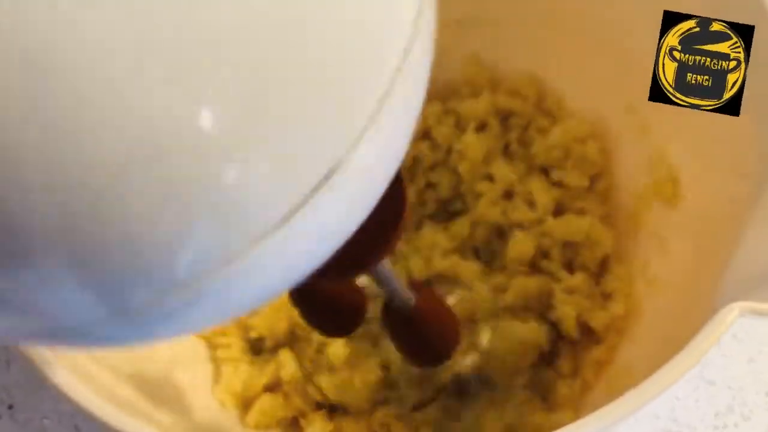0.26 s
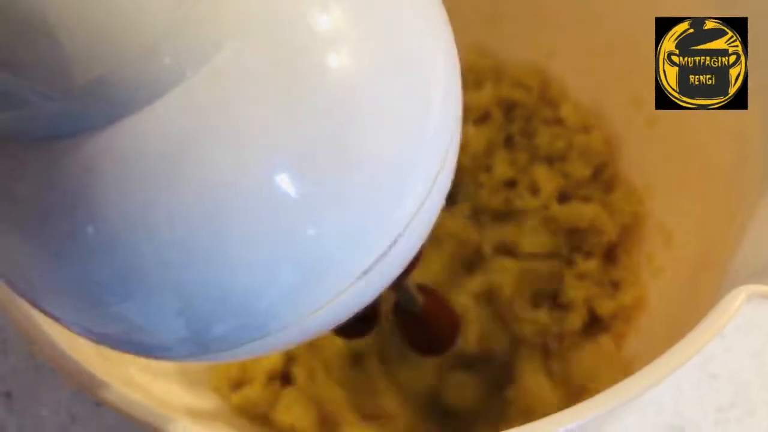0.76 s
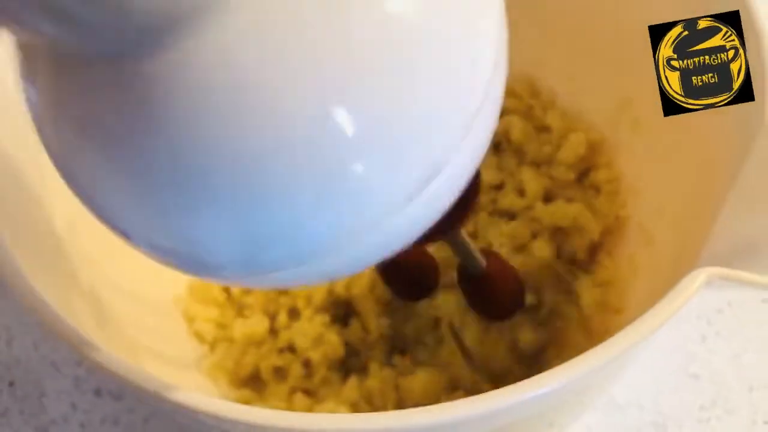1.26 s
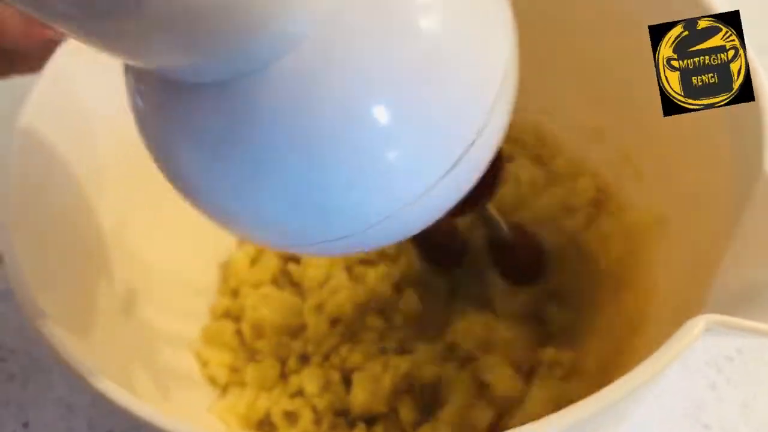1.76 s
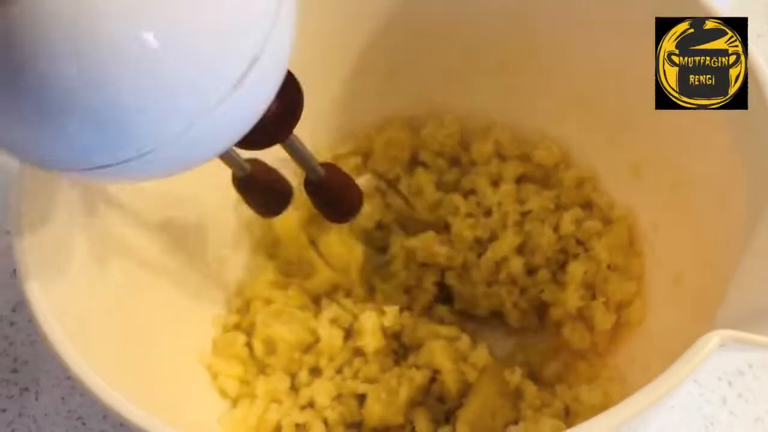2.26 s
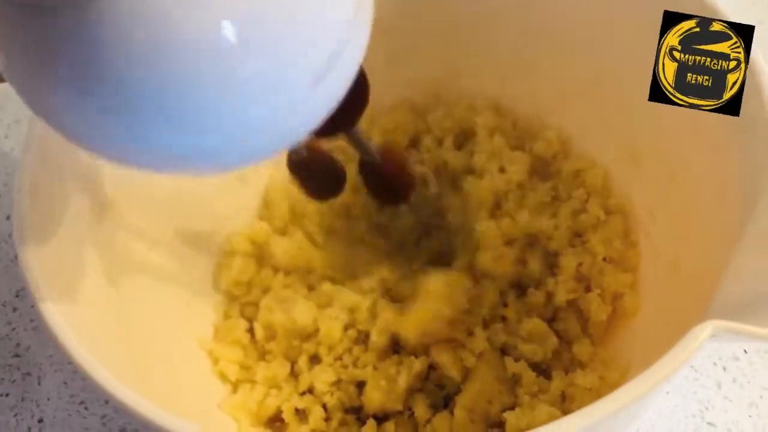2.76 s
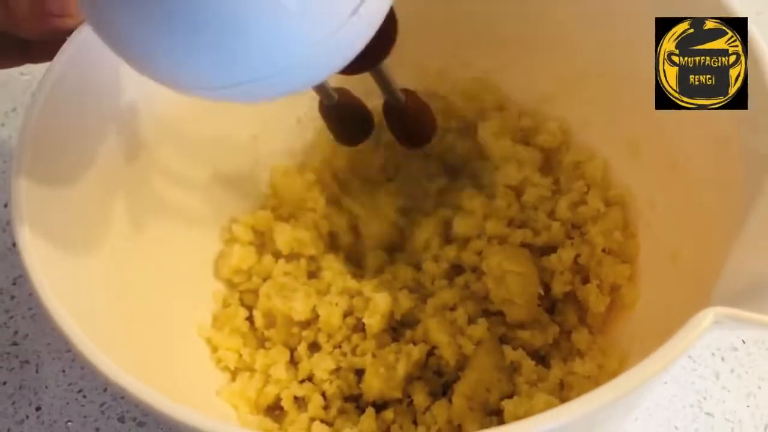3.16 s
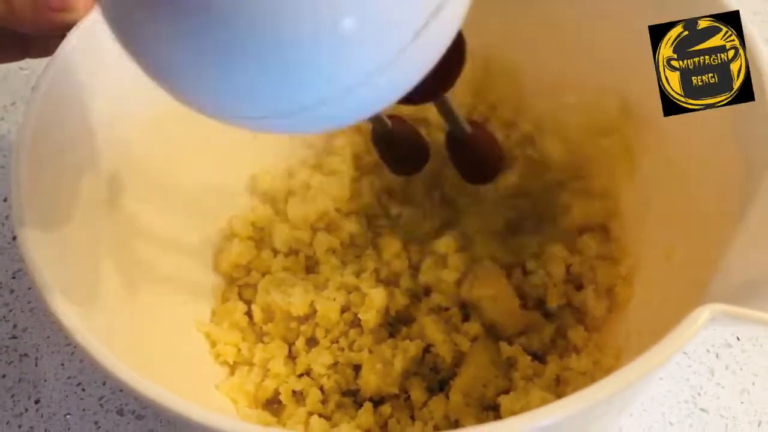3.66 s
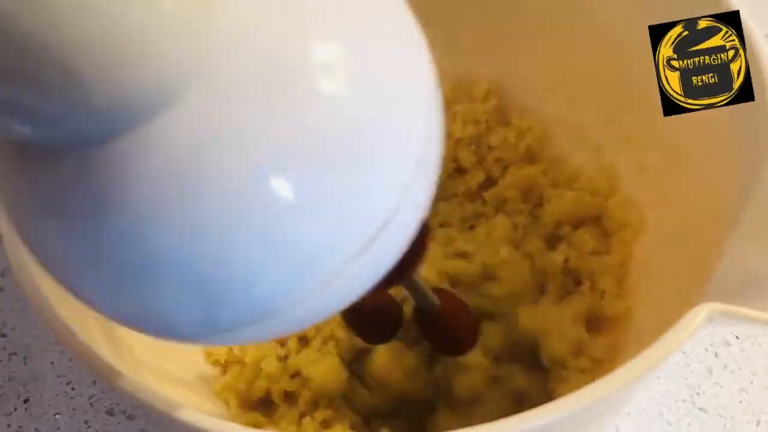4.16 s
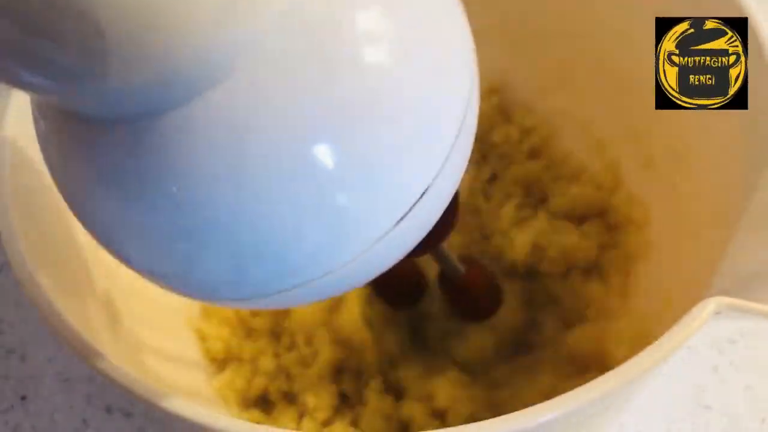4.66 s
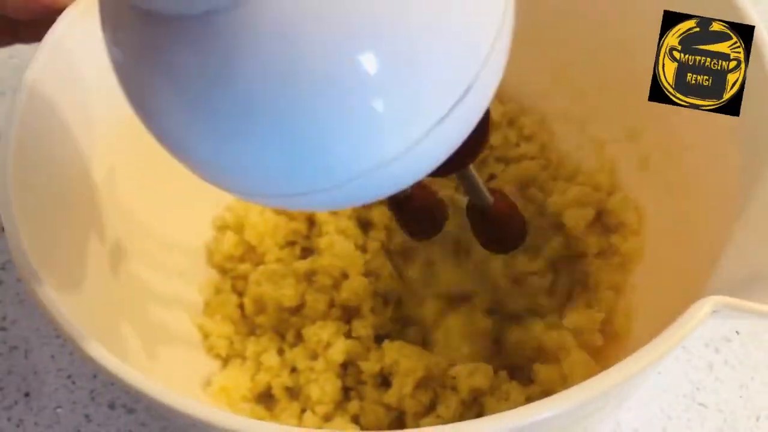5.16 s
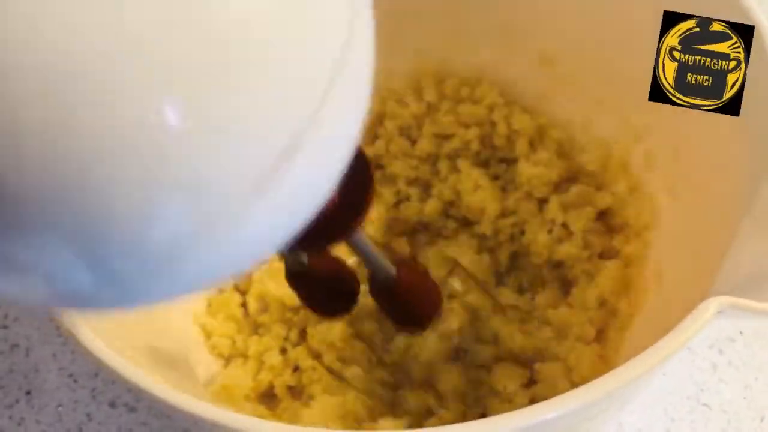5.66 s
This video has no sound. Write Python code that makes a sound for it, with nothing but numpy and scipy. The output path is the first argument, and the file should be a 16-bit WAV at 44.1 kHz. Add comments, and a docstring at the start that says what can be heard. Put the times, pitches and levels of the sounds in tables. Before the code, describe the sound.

An electric mixer is pulsed in crumbly dough, its whine repeatedly leaping up and sinking away, with dull bowl knocks and faint rumble.

```python
"""Short bursts of a hand mixer, whirring up and coasting down in crumbly dough in a plastic bowl, heard close by.
Slot and commutator whine, shaft orders and brush hiss are coloured by the casing; the pitch moves in small steps.
The beaters knock on the bowl, which rings briefly and cracks.
Behind it the worktop rumbles as the bowl bumps it, and a low hum wavers.
All of it reaches one microphone that drops the deepest bass."""
import sys
import numpy as np
from scipy import signal
from scipy.fft import rfft, irfft, next_fast_len
from scipy.io import wavfile
from scipy.ndimage import uniform_filter1d

SR = 44100
rng = np.random.default_rng(int(sys.argv[2]) if len(sys.argv) > 2 else 0)


def master(y):
    """Save y as 16-bit WAV."""
    cut = np.clip(np.atleast_2d(y).T, -1, 1)
    pcm = np.round(cut * 32767)  # scale
    wavfile.write(sys.argv[1], SR, pcm.astype(np.int16))


N = 260190

# Low hum: [t/s, level/dB]
HUM_LEVEL = [(0, -51), (1.2, -50.5), (2.1, -56), (2.5, -66.5), (5.9, -72)]
HUM_HZ = 121
# The bowl bumps the worktop: [t/s, rumble level/dB]
WORKTOP_BUMPS = [(.52, -33.5), (.7, -42), (1.03, -38), (2.28, -42.5), (3.12, -49), (4.3, -39.5), (5.9, -34)]
BUMP_RISE_DB_S, BUMP_FALL_DB_S, RUMBLE_FLOOR_DB = 156, 66, -59

# Beater on bowl: [t/s, knock level/dB, crack level/dB]
BEATER_KNOCKS = [(0.49, -18.5, -28), (0.595, -16, -40), (0.976, -14, -10.5), (1.062, -15.5, -32),
                 (1.209, -23, -36), (1.545, -24, -40), (2.07, -21.5, -33), (2.101, -18, -29),
                 (2.182, -17.5, -40), (2.236, -23.5, -25), (2.315, -25, -22), (2.962, -19, -28),
                 (2.994, -18.5, -31), (3.05, -16.5, -34), (3.091, -16, -39), (4.252, -29.5, -42),
                 (4.293, -26, -20), (4.345, -26.5, -30), (5.669, -22, -44), (5.829, -22.5, -27)]
# Bowl resonances, damped by dough: [f/Hz, relative level/dB, decay by 60 dB t60/s]
BOWL_MODES = [(222, -6, 0.22), (311, -6, 0.15), (440, 0.5, 0.084), (563, 9.5, 0.096), (810, 2, 0.065),
              (1600, -5, 0.032)]

# Each press of the switch: [on t/s, off t/s, pull share, drag share near rest, drag share at top speed]
SWITCH_PRESSES = [(-1, 0, 1, 1.426, 0), (.3619, .6, .936, .959, 1.152), (1.1833, 1.54, .95, 1.001, 1.037),
                  (2.124, 2.42, 1.033, 1.37, .77), (3.0419, 3.35, 1.087, 1.439, .857),
                  (4.2202, 4.4, .991, .314, 1.563), (4.9061, 5.08, 1.145, .916, 1.065),
                  (5.8077, 6.5, .919, 1, 1)]
# Motor pull: [speed/(rev/s), gain/(rev/s per s)]
MOTOR_PULL = [(10, 3513), (80, 2353), (140, 1370), (200, 584), (240, 410), (280, 29)]
# Friction and dough: [speed/(rev/s), loss/(rev/s per s)]
DOUGH_DRAG = [(10, 186), (40, 207), (70, 371), (110, 322), (150, 275), (200, 305), (270, 438)]
START_REV_S, TOP_REV_S = 119, 270
CATCH_S = .0075  # the sound follows the switch after this lag
STEP_S, STEP_START_S = .01998, .0154  # length of a pitch step, start of step 1

# Shaft orders: multiples of the speed, with 6 fan blades [multiple]
SHAFT_ORDERS = [1, 2, 3, 4, 5, 6, 7, 8, 9, 10, 11, 12, 13, 15, 16, 18, 27, 31, 36]
# Shaft orders against the brush noise, one for each multiple [level/dB]
SHAFT_LEVELS = [-11, -13, -16, -18, -20, -15, -25, -19, -22, -21, -20, -14, -15, -16, -14, -18, -14, -24,
                -23]
# Whine against the brush noise, at multiples of the slot rate (14 a turn), powered and coasting:
# [speed/(rev/s), slots level/dB, 28 commutator bars level/dB, third harmonic level/dB, higher harmonics level/dB]
POWERED_WHINE = [(110, -10, -11, -6, -6), (170, -12, -2, -6, -4), (200, -13, 0, -5, -12),
                 (220, -11, -1, -6, -24), (250, -3, -3, -2, -24), (272, -3, -6, -4, -24)]
COASTING_WHINE = [(15, -24, -20, -24, -24), (40, -6, -11, -11, -9), (60, -4, -8, -9, -7),
                  (85, -8, -9, -8, -6), (110, -9, -8, -10, -11), (130, -13, -8, -9, -13),
                  (155, -16, -12, -15, -10), (185, -17, -10, -19, -10), (215, -12, -6, -9, -24),
                  (245, -12, -7, -5, -24), (272, -4, -7, -5, -24)]
# Harmonics 4 to 11 of the slot rate, on top of the higher-harmonics level: [level/dB]
UPPER_LEVELS = [0, 0.5, 0.5, 0, -1.5, -2.5, -3.5, -4.5]
# Colour of the first three harmonics: [f/Hz, level/dB]
LOWER_WHINE_COLOUR = [(600, -.5), (2500, -2), (3600, .5), (4500, -.5), (6000, -.5), (7500, -2.5),
                      (15000, -5)]
# Colour of the higher harmonics: [f/Hz, level/dB]
UPPER_WHINE_COLOUR = [(600, -6), (2500, -8), (3800, -4), (5200, 3), (6200, 0), (7200, -7), (15000, -10)]

# Broad colour of the shell: [f/Hz, relative level/dB]
SHELL_COLOUR = [(82, -56), (140, -21.5), (360, -19), (567, -15), (626, -10.5), (825, -8), (985, -14),
                (1400, -0.5), (1640, -4.5), (3410, 0.5), (4580, 6.5), (5690, 0.5), (8430, -7.5),
                (10300, -7.5), (15500, -29.5)]
# Peaks and dips of the shell: [f/Hz, width/Hz, lift/dB]
SHELL_MODES = [(1520, 170, -1), (1984, 113, 4.5), (3206, 1770, 8), (5535, 1100, 6), (9900, 240, 4),
               (8550, 210, -4.5), (2750, 730, -3)]
SPLIT_HZ = [110, 700, 2600, 7000]  # lower edges of drone, grind, whirr and sizzle
CUTOFF_HZ = 15650

# Base levels by speed, powered and coasting: [speed/(rev/s), whirr level/dB, brush sizzle level/dB,
# gear grind level/dB, shaft drone level/dB]
POWERED_LEVELS = [(60, -31.5, -35.5, -29, -46), (111, -20, -25, -24.5, -46),
                  (154, -13.5, -19.5, -23, -43.5), (193, -12, -18, -28, -51), (234, -13, -16, -27, -44.5),
                  (265, -16.5, -15, -29, -45.5)]
COASTING_LEVELS = [(1, -64, -85, -50, -52), (17.9, -44.5, -65, -41.5, -58.5),
                   (40.5, -38, -44.5, -33.5, -52.5), (58.5, -30.5, -36, -32.5, -50),
                   (87, -25, -24.5, -27.5, -50), (111, -22, -22, -27.5, -49),
                   (140, -20, -23.5, -30.5, -47.5), (194, -19, -22, -26, -46),
                   (277, -19.5, -20.5, -27.5, -45)]
# A harsh rasp carries on after each switch-off, then drops out; balance of each press:
# [rasp end t/s, whirr powered/dB, rasping/dB, after/dB, sizzle powered/dB, rasping/dB, after/dB,
#  grind/dB, drone/dB, commutator whine rasping/dB, after/dB]
PRESS_BALANCE = [(.03, 0, 5, 2.3, 0, 8, 4, 1, 6.5, 7, 6), (.8, 1.3, 8.5, 3.5, 0, 6, -2, 2.5, 4.5, 4, -1),
                 (1.87, 1, 4.5, -1, -2, 5, -1, -3, -4, -0.5, -0.5),
                 (2.54, -5, 2, 0.5, 1, 5.5, -5, -3, -1, -12, -3),
                 (3.56, 0, 5, 5, -2.5, 3.5, 5.5, -0.5, 1.2, -5, .5),
                 (4.65, -1.5, 7, 3.5, 2.5, 9, 1.5, -0.7, 2.7, 0.5, -0.5),
                 (5.24, -2.5, 3.5, 0, 3.5, 9.5, 4, 0.2, 2.5, -3, -2),
                 (6.5, 4.5, 0, 0, 6.5, -2, 0, 0.5, 3, 0, 0)]
RASP_FADE_S = 0.077
# The whirr swells and sinks as the mixer is moved about the bowl: [t/s, level/dB]
WHIRR_SWELL = [(0, -1.5), (.2, 2.5), (.5, -6.5), (.93, 1), (.965, -5), (.99, 3.5), (1.02, 0), (1.3, -4.8),
               (1.46, -3.5), (1.79, 4), (1.9, -1.5), (1.96, 2.5), (2.12, -4), (2.4, 4), (2.79, -4),
               (2.83, 3), (3.1, -4.5), (3.38, 2.5), (3.6, -3), (3.73, 2), (3.82, -2.5), (4.1, -4),
               (4.5, -1), (4.9, -.5), (5.3, 4), (5.58, 6.5), (5.68, 2.5), (5.8, -8), (5.83, -6), (5.9, -7)]
# The treble drifts: [t/s, level/dB]
TREBLE_DRIFT = [(0, -10.8), (.3, 4), (1.0, -2), (1.18, 4.5), (1.6, 1), (1.85, -1), (2.1, -4), (2.7, 1),
                (3.04, -1), (3.2, 1.5), (3.7, -3), (3.9, -6), (4.05, 1), (4.2, 2.5), (4.7, -5.5),
                (4.9, -2.5), (5.5, -2.5), (5.7, -1), (5.9, -4)]


def from_db(db):
    """Gain of a level."""
    return 10 ** (np.asarray(db) / 20)


def rms_one(x):
    """Scale to unit power."""
    return x / np.sqrt(np.mean(x ** 2) + 1e-20)


def interpolate(rows, x):
    """Columns of a curve table, read at x (its first column)."""
    places, *columns = np.transpose(rows)
    return [np.interp(x, places, column) for column in columns]


def at_hz(points, hz):
    """A spectrum read on a log-frequency axis."""
    point_hz, level_db = np.transpose(points)
    return np.interp(np.log(hz), np.log(point_hz), level_db)


def drift(rate_hz):
    """Random wander of spread 1: noise through a double low-pass pole."""
    pole = np.exp(-2 * np.pi * rate_hz / SR)
    noise = rng.standard_normal(N + SR)
    settled = signal.lfilter([1], [1, -2 * pole, pole * pole], noise)[SR:]
    return rms_one(settled)


def band_noise(low_hz, high_hz):
    """Band-passed noise of unit power, with the filter's first second left out."""
    band = signal.butter(2, [low_hz, high_hz], "band", fs=SR, output="sos")
    return rms_one(signal.sosfilt(band, rng.standard_normal(N + SR))[SR:])


def worktop():
    """Lumpy rumble through the counter, lifted by each bump, and a faint wavering hum."""
    t = np.arange(N) / SR
    wander = 1.2 * drift(3.4)  # phase in radians
    hum = np.sqrt(2) * np.sin(2 * np.pi * HUM_HZ * t + wander)
    hum = hum * from_db(interpolate(HUM_LEVEL, t)[0])
    bumps_db = [db - np.maximum(BUMP_RISE_DB_S * (s - t), BUMP_FALL_DB_S * (t - s))
                for s, db in WORKTOP_BUMPS]
    rumble_db = np.maximum(np.max(bumps_db, axis=0), RUMBLE_FLOOR_DB)
    return from_db(rumble_db) * band_noise(38, 68) + hum


def ring(clicks, hz, t60):
    """A unit click sets a decaying sine of starting height 1 ringing."""
    decay = from_db(-60 / (t60 * SR))
    angle = 2 * np.pi * hz / SR
    return signal.lfilter([0, np.sin(angle)], [1, -2 * decay * np.cos(angle), decay * decay], clicks + 1e-18)


def knocks():
    """Each knock rings the bowl, damped by dough, and gives a short crack of noise."""
    seconds, knock_db, crack_db = np.transpose(BEATER_KNOCKS)
    at = np.round(seconds * SR).astype(int)
    spread_db = rng.normal(0, 2.5, (len(at), len(BOWL_MODES)))  # no two knocks excite the modes alike
    bowl = np.zeros(N)
    for k, (hz, level_db, t60) in enumerate(BOWL_MODES):
        clicks = np.zeros(N)
        clicks[at] = from_db(knock_db + level_db - 16 + spread_db[:, k])
        bowl += ring(clicks, hz, t60)
    clicks = np.zeros(N)
    clicks[at] = from_db(crack_db)
    decay = from_db(-60 / (0.076 * SR))  # t60 of 0.076 s
    fade = signal.lfilter([1], [1, -decay], clicks + 1e-18)
    return bowl + fade * band_noise(900, 6500)


def switch(t, lag_s):
    """Number of the latest press, and whether the switch is down; only switching on lags."""
    on, off = np.transpose(SWITCH_PRESSES)[:2]
    press = np.searchsorted(on + lag_s, t) - 1
    return press, t < off[press]


def spin():
    """Speed every millisecond: the motor pulls while switched on, friction and dough slow it after."""
    t = np.arange(0, N / SR + .05, .001)
    on, off, pull, slow_drag, fast_drag = np.transpose(SWITCH_PRESSES)
    speed, rev_s = np.zeros(len(t)), START_REV_S
    for i, k in enumerate(np.searchsorted(on, t) - 1):
        speed[i] = rev_s
        if t[i] < off[k]:
            pulled_s = min(.001, t[i] - on[k])
            rev_s += pulled_s * pull[k] * interpolate(MOTOR_PULL, rev_s)[0]
        else:
            share = slow_drag[k] + (fast_drag[k] - slow_drag[k]) * rev_s / TOP_REV_S
            rev_s = max(rev_s - .001 * share * interpolate(DOUGH_DRAG, rev_s)[0], 1)
    return t, speed


def steps(spin_up, coast):
    """Step number and stepped clock: within a step time runs at a share of its pace, then jumps on."""
    t = np.arange(N) / SR
    place = (t - STEP_START_S) / STEP_S + 1
    step = np.floor(place).astype(int)
    rising = switch(t, 0)[1]
    pace = np.where(rising, spin_up, coast)
    clock = STEP_START_S + STEP_S * (step - .5 + pace * (place - step - .5))
    return step, clock


def per_step(step, spread):
    """A new chance value for every step, joined by a 2 ms fade."""
    values = spread * rng.standard_normal(step.max() + 1)
    return uniform_filter1d(values[step], size=88)


def by_speed(powered_rows, coasting_rows, speed, powered):
    """Columns of the law that holds for the state of the switch."""
    return np.where(powered, interpolate(powered_rows, speed), interpolate(coasting_rows, speed))


def by_phase(clock, column):
    """Switch state, a balance fading from rasping to after, and all balances of the press."""
    press, powered = switch(clock, CATCH_S)
    ends, *balance = np.transpose(PRESS_BALANCE)[:, press]
    rasp = np.clip((ends - clock) / RASP_FADE_S + .5, 0, 1)
    return powered, rasp * balance[column] + (1 - rasp) * balance[column + 1], balance


def levels(clock, speed):
    """Whirr, sizzle, grind and drone in dB: the speed law plus the balance of the press."""
    powered, coasting_whirr_db, balance = by_phase(clock, 1)
    coasting_sizzle_db = by_phase(clock, 4)[1]
    whirr_db = np.where(powered, balance[0], coasting_whirr_db) + interpolate(WHIRR_SWELL, clock)[0]
    sizzle_db = np.where(powered, balance[3], coasting_sizzle_db) + interpolate(TREBLE_DRIFT, clock)[0]
    total_db = by_speed(POWERED_LEVELS, COASTING_LEVELS, speed, powered)
    total_db += [whirr_db, sizzle_db, balance[6], balance[7]]
    return uniform_filter1d(total_db, size=110, axis=1)  # 2.5 ms fade


def partials(multiples, levels_db, colour, speed, turn, step, skip, beat_db):
    """Sines locked to the shaft; each step they slip in phase (skip, radians) and swell or fade."""
    out = np.zeros(N)
    for order, level_db in zip(multiples, levels_db):
        hz = order * speed
        audible = np.clip((CUTOFF_HZ - hz) / 500, 0, 1)
        gain = from_db(level_db + at_hz(colour, hz) + per_step(step, beat_db))
        phase = per_step(step, skip) + rng.uniform(0, 2 * np.pi)
        out += audible * gain * np.sin(order * turn + phase)
    return out


def armature(step, clock, speed, wobble, throb, runout, grit_db):
    """Shaft tones over brush noise; an out-of-round commutator makes whine and noise throb once a turn."""
    speed = uniform_filter1d(speed, size=44)
    powered, coasting_bars_db, _ = by_phase(clock, 8)
    tones_db = by_speed(POWERED_WHINE, COASTING_WHINE, speed, powered)
    tones_db[1] += ~powered * coasting_bars_db
    speed = speed * (1 + wobble * (speed / 250) ** 2 * drift(250))  # brushes bounce more at speed
    turn = 2 * np.pi * np.cumsum(speed) / SR

    slot_db, bars_db, third_db, upper_db = uniform_filter1d(tones_db, size=88, axis=1)
    lower_levels = [slot_db, bars_db, third_db]
    upper_levels = [upper_db + db for db in UPPER_LEVELS]
    slots = 14 * np.arange(1, len(lower_levels + upper_levels) + 1)
    whine = partials(slots[:3], lower_levels, LOWER_WHINE_COLOUR, speed, turn, step, skip=1.2, beat_db=2.8)
    whine += partials(slots[3:], upper_levels, UPPER_WHINE_COLOUR, speed, turn, step, skip=1.2, beat_db=2.8)
    runout = runout * (1 + .4 * (speed / 250) ** 4)  # felt more at speed
    whine = whine * (1 + runout * np.cos(turn + drift(15.4))) / np.sqrt(1 + runout ** 2 / 2)

    flat = [(100, 0), (9000, 0)]
    shaft = partials(SHAFT_ORDERS, SHAFT_LEVELS, flat, speed, turn, step, skip=.6, beat_db=3.0)
    grit = from_db(grit_db * drift(100))
    brushes = rng.standard_normal(N) * (1 + throb * np.cos(turn)) * grit
    return rms_one(brushes) + whine + shaft


def casing(source):
    """The shell colours the sound; four frequency regions of it, each of unit power."""
    size = next_fast_len(N)
    hz = np.maximum(np.arange(size // 2 + 1) * SR / size, 1)
    colour_db = at_hz(SHELL_COLOUR, hz)
    for mode_hz, width, lift_db in SHELL_MODES:
        colour_db = colour_db + lift_db / (1 + (2 * (hz - mode_hz) / width) ** 2)
    spectrum = rfft(source, size) * from_db(colour_db)
    above = [1 / (1 + (edge / hz) ** 8) for edge in SPLIT_HZ] + [0]
    return [rms_one(irfft(spectrum * (low - high), size)[:N]) for low, high in zip(above, above[1:])]


def mixer():
    """The motor heard through its shell; every step is a little louder or softer."""
    step, clock = steps(spin_up=.15, coast=.55)
    speed = np.interp(clock, *spin())
    whirr_db, sizzle_db, grind_db, drone_db = levels(clock, speed)
    source = armature(step, clock, speed, wobble=.013, throb=.35, runout=.5, grit_db=.9)
    drone, grind, whirr, sizzle = casing(source)
    sizzle_db = sizzle_db + per_step(step, 1.4)
    body = from_db(whirr_db) * whirr + from_db(sizzle_db) * sizzle
    body += from_db(grind_db) * grind + from_db(drone_db) * drone
    return from_db(per_step(step, 0.27)) * body


def scene():
    """All sources at one microphone."""
    return (worktop() + knocks() + mixer())[None]


def record(dry):
    """The microphone drops the deepest bass; peaks are rounded, the top is cut."""
    bass_cut = signal.butter(2, 38, "high", fs=SR, output="sos")
    top_cut = signal.ellip(12, .5, 80, CUTOFF_HZ, fs=SR, output="sos")
    rounded = .96 * np.tanh(signal.sosfilt(bass_cut, dry) / .96)
    return signal.sosfilt(top_cut, rounded)


dry = scene()
out = record(dry)
master(out)
```